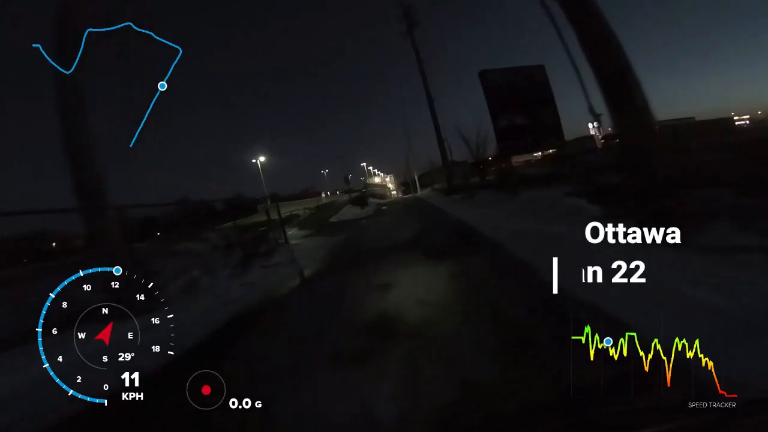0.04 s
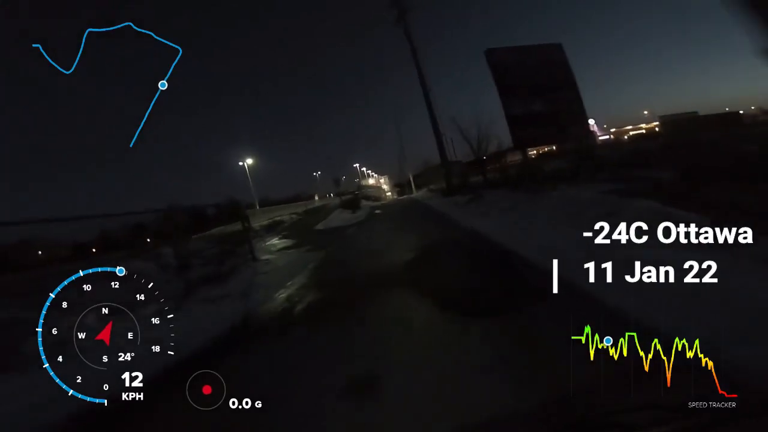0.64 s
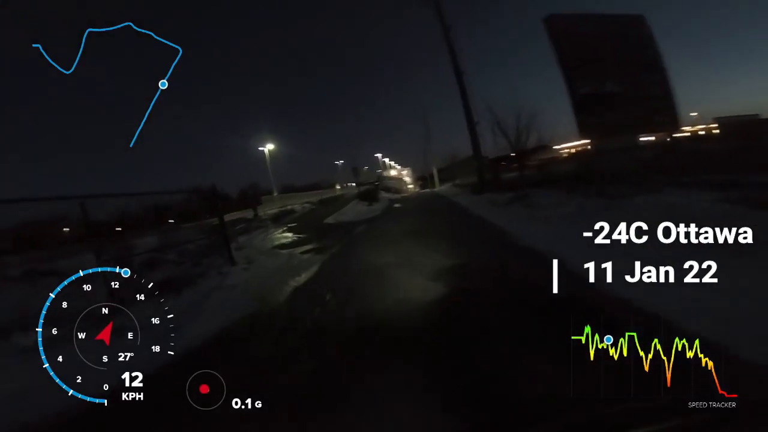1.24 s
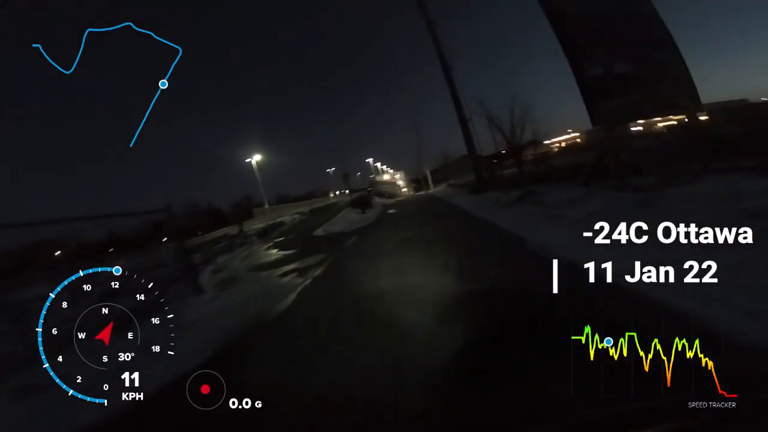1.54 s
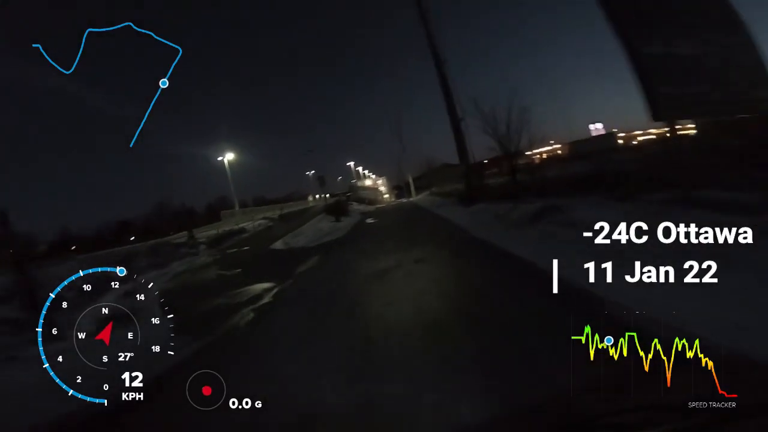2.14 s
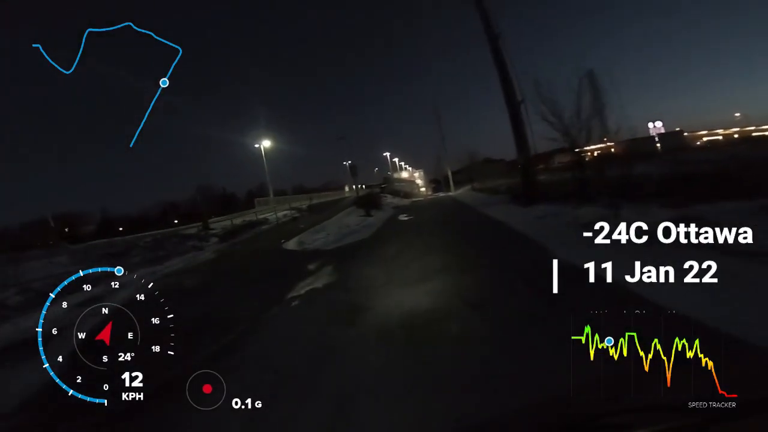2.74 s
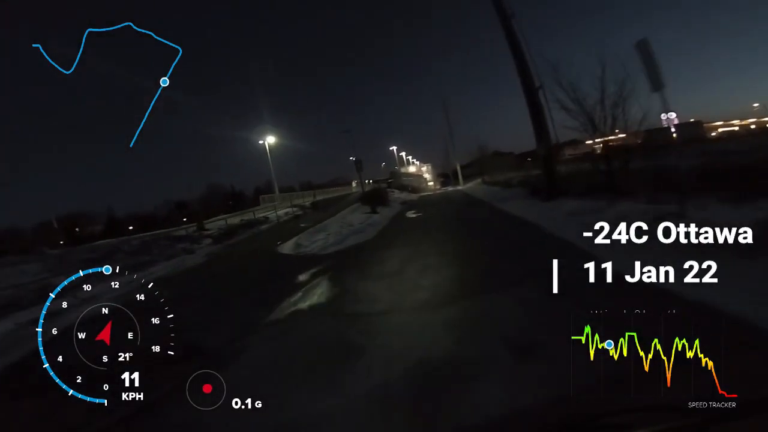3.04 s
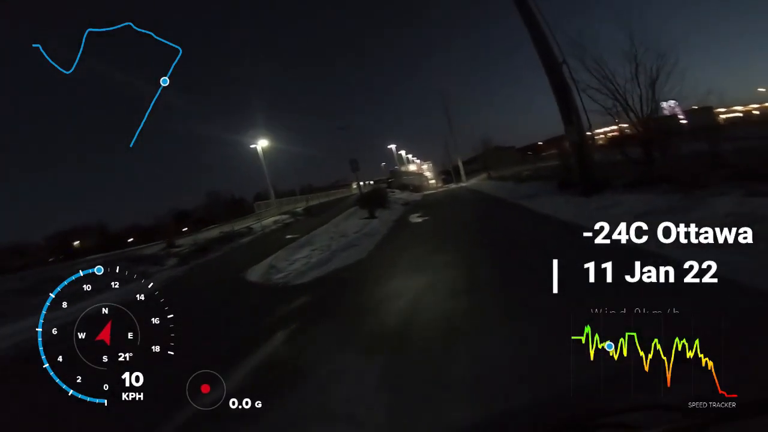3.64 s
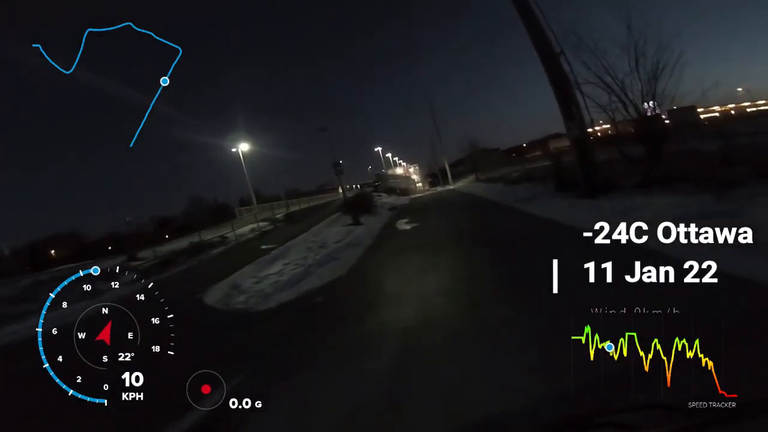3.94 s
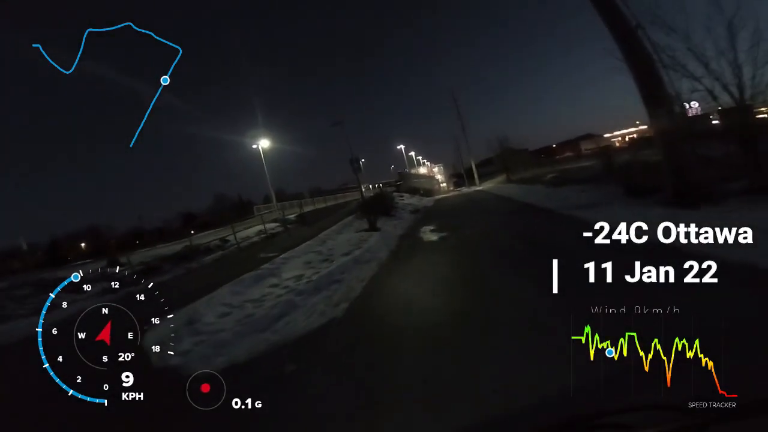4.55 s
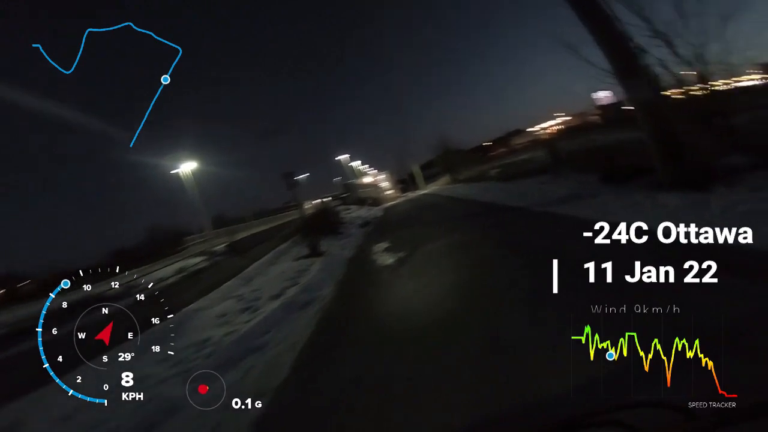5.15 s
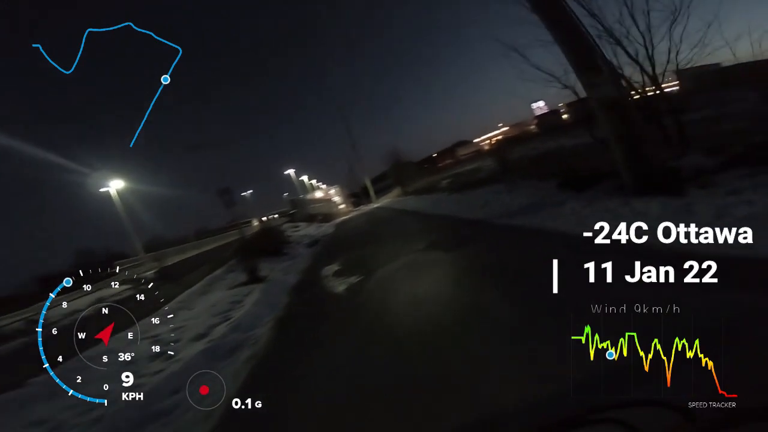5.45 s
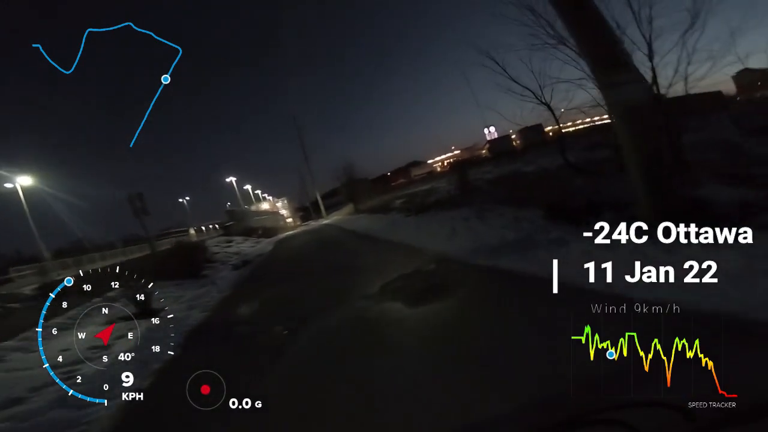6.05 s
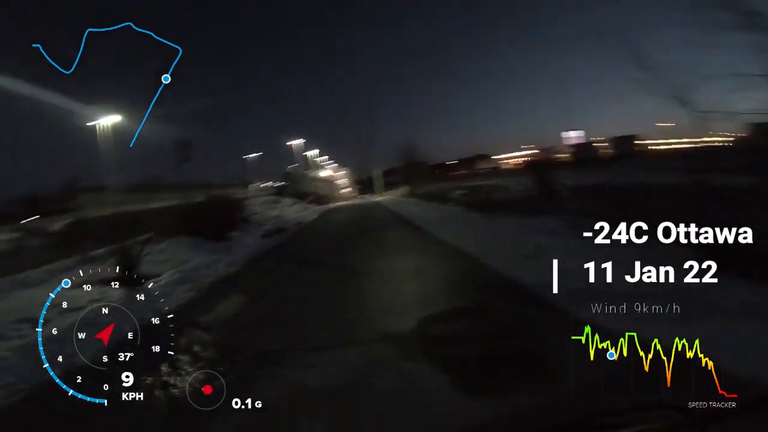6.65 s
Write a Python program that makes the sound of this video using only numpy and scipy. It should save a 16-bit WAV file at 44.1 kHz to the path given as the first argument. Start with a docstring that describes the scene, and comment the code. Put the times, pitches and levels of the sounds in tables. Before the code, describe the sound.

A bicycle rolls over a frozen path, heard from a microphone on the bike. A low, fluttering tyre hum, frame rumble and wind buffeting run throughout, above a faint crunch of frost. The chain rasps softly about three times a second with the pedalling and sometimes clacks. A rut thuds at 0.4 seconds and ice snaps at about 0.9. The hum swells unevenly between 1 and 3.4 seconds. At 2.3 seconds a sharp knock comes with a brief metallic clink, and smaller knocks and ticks follow around 3 and 4.2. From about 2.5 seconds the hum sinks in pitch as the bike slows. The heaviest low thump lands at 3.8 seconds, with the wind now slightly stronger. Softer bouncing jolts follow from 4.2 to 6.3, with chain clacks near 5.2 and 6. The bike is still rolling at almost 7 seconds.

```python
"""A low, fluttering hum and rumble: a bicycle rolls along a frozen path and slows down.
The tyre tread hums, bumps shake the frame and air buffets the microphone of a camera on the bike.
The chain rasps with each pedal stroke and sometimes clacks. Frost crunches finely under the tyres;
now and then a bit of ice snaps or a bump knocks the camera mount."""
import sys
import numpy as np
from scipy import signal
from scipy.fft import rfft, irfft, next_fast_len
from scipy.io import wavfile
from scipy.ndimage import uniform_filter1d, map_coordinates

SR = 44100
rng = np.random.default_rng(int(sys.argv[2]) if len(sys.argv) > 2 else 0)


def generate_wav(signal):
    """Clip the signal to [-1, 1] and save it as 16-bit WAV at the path in sys.argv[1]."""
    frames = np.transpose(np.atleast_2d(signal))
    scaled = np.clip(frames, -1, 1) * 32767
    pcm = np.round(scaled).astype(np.int16)
    wavfile.write(sys.argv[1], SR, pcm)


N = 299880

# what the frame lets through to the camera: (frequency [Hz], gain [dB])
FRAME_FILTER = [(150, -16.5), (400, 2.5), (960, 2.5), (1280, -18), (1700, -13.5), (3500, -43)]


def amp(db):
    """Turn decibels into a number to multiply by."""
    return 10 ** (np.asarray(db) / 20)


def unit(x):
    """Scale x to an average strength (rms) of 1."""
    return x / np.sqrt(np.mean(x ** 2) + 1e-20)


def curves(rows):
    """Join a table's points over time: one curve for each column after the first."""
    times, *columns = np.transpose(rows)
    return [np.interp(np.arange(N) / SR, times, column) for column in columns]


def wobble(rate):
    """A smooth curve through random points, rate of them a second."""
    points = rng.standard_normal(int(N * rate / SR) + 4)
    return unit(map_coordinates(points, [np.arange(N) * rate / SR]))


def filtered(x, response):
    """Multiply each frequency in x by response(hz)."""
    size = 2 * next_fast_len(N // 2 + SR // 4)
    return irfft(rfft(x, size) * response(np.fft.rfftfreq(size, 1 / SR)), size)[:N]


def coloured(x, points):
    """Give x the tone colour outlined by (frequency [Hz], gain [dB]) points."""
    def response(hz):
        point_hz, db = np.transpose(points)
        gain = amp(np.interp(np.log(hz + 1), np.log(point_hz), db))
        # fold the cepstrum so that the filter rings only after a hit, never before
        cepstrum = irfft(np.log(gain))
        half = len(cepstrum) // 2
        cepstrum[1:half] *= 2
        cepstrum[half + 1:] = 0
        return np.exp(rfft(cepstrum))
    return filtered(x, response)


def rung(x, modes):
    """Let x ring a body with (frequency [Hz], width [Hz], gain [dB]) resonances."""
    return filtered(x, lambda hz: sum(
        amp(db) * 1j * hz * width / (centre ** 2 - hz ** 2 + 1j * hz * width)
        for centre, width, db in modes))


def grains(rate, spread_db):
    """Tiny impacts of random size at random times, about rate a second."""
    size = amp(spread_db * np.clip(rng.standard_normal(N), -2, 2))
    happens = rng.random(N) < rate / SR
    return unit(happens * rng.choice([-1, 1], N) * size)


def strike(colour, db, t60):
    """A crack and a brief crumbling ring a body; db is the level of the loudest 2 ms."""
    t = np.arange(len(colour)) / SR
    # t60 is the time in seconds to fade by 60 dB
    crumble = rng.standard_normal(len(t)) * amp(-60 * t / t60) * (1 - np.exp(-t / 0.000065))
    crack = amp(15.5) * signal.unit_impulse(len(t), round(0.001003 * SR))  # 1 ms after first touch
    blow = signal.fftconvolve(crumble + crack, colour)[:len(t)]
    loudest = np.sqrt(uniform_filter1d(blow ** 2, SR // 500).max())
    return amp(db) * blow / loudest


def wind():
    """The head wind buffets the microphone, harder in the second half of the ride."""
    # strength of the gusts: (time [s], level [dB])
    gusts = [(0, -36), (1.0, -39), (3.2, -38.5), (3.7, -35), (4.3, -35), (4.6, -37), (5.3, -35.5),
             (6.8, -36.5)]
    # the wind's deep tone: (frequency [Hz], gain [dB])
    tone = [(10, -11), (25, -9), (45, -1), (65, -2), (110, -1.5), (200, -22), (400, -34), (1500, -79.5)]
    gust_db, = curves(gusts)
    return amp(gust_db + 1.5 * wobble(5)) * unit(coloured(rng.standard_normal(N), tone))


def rolling(speed, ground):
    """Grains of packed snow drum through the tyres into the mount, harder at speed."""
    # tone of the drumming: (frequency [Hz], gain [dB])
    tone = [(120, -23.5), (260, -3), (330, 3.5), (420, 5.5), (600, 4.5), (800, 2.5), (950, -5),
            (1100, -5.5), (1200, -14), (1420, -25), (1650, -8.5), (1850, -20.5), (2500, -35), (4000, -55.5)]
    drumming = unit(coloured(grains(rate=2500, spread_db=4.0), tone))
    return amp(-50.5 + 1.2 * ground + 1.76 * wobble(30)) * speed ** 0.52 * drumming


def crunch(speed, ground, push):
    """Frost crumbles in small clumps under the tread; coarse ice crackles and fine crystals glint."""
    # frost under the tyres: (time [s], level [dB], coarse grit compared with fine [dB])
    frost = [(0, -68.5, -5), (0.5, -66, -2.5), (0.8, -69.5, -6), (1.1, -65, -5), (1.3, -72, -8),
             (1.65, -65.3, -2.5), (1.85, -68.5, -4.5), (2.25, -69.5, -3), (2.38, -66, 2.5),
             (2.66, -66, 2.5), (2.76, -68.5, -0.5), (2.95, -66.5, 2), (3.1, -69, -2.5), (3.6, -69.5, -2),
             (3.9, -67.5, -3), (4.7, -68, -1), (5.7, -67, -5.5), (6.4, -65.5, -2), (6.8, -68.5, -3)]
    # tones of hissing frost, crackling ice and glinting crystals: (frequency [Hz], gain [dB])
    hiss_tone = [(900, -17), (2000, -17.5), (2600, -20), (3500, -17.5), (3900, -13.5), (4300, -3),
                 (4900, 1.5), (5150, 0), (5550, 0.5), (6200, -8.5), (7000, -19.5), (8200, -23),
                 (10500, -41.5), (16000, -59)]
    crackle_tone = [(300, -9), (1000, -1.5), (1700, 5.5), (2200, 0), (2800, -3), (3400, -2.5), (4300, 0.5),
                    (5900, -12), (6800, -29.5), (15000, -40.5)]
    glint_tone = [(3000, -20), (6800, -0.5), (8100, 8), (9000, 2), (10000, -7), (11500, -25.5), (12500, -8),
                  (14000, -18), (16000, -24.5)]
    level_db, grit_db = curves(frost)
    crust_db = 1.15 * wobble(30)  # the crust is uneven
    bite_db = 0.14 * push / push.max()  # pedalling drives the rear tyre into the frost
    level_db = level_db + crust_db + bite_db + 0.2 * ground
    fine = unit(rng.standard_normal(N) * amp(1.7 * wobble(170)))
    breaks = grains(rate=90 * speed, spread_db=2.5) ** 2
    crumble_s = 0.0012  # how long one clump takes to break
    crumbling = signal.lfilter([1], [1, -np.exp(-1 / (crumble_s * SR))], breaks)
    coarse = amp(grit_db) * unit(np.sqrt(np.abs(crumbling)) * rng.standard_normal(N))
    hiss = unit(coloured((fine + coarse) / np.hypot(1, amp(grit_db)), hiss_tone))
    ice = grains(rate=1200, spread_db=6.0) * amp(5.7 * np.tanh(wobble(70)))
    crackles = unit(coloured(ice, crackle_tone))
    crystals = grains(rate=1800, spread_db=3.5) * amp(2 * wobble(25))
    glints = unit(coloured(crystals, glint_tone))
    return amp(level_db + 3.5) * (hiss + amp(-11.0) * crackles + amp(-16.0) * glints)


def hits():
    """Snow pops, ice splits and snaps, crystals ping; bumps tick the camera shell and knock its mount."""
    # the tone of each thing struck: (frequency [Hz], gain [dB])
    ice_tone = [(400, -4), (900, -1.5), (1700, 2), (2400, -7.5), (2900, -4), (3600, -3), (4300, 8),
                (5000, 2.5), (5600, -0.5), (6400, -11), (7200, -25), (15000, -41.5)]  # a plate of ice splitting
    snow_tone = [(300, -10.5), (1000, 2), (1700, 8.5), (2300, 0), (2900, -6), (3500, -18), (5000, -24.5),
                 (15000, -45)]  # packed snow giving way
    shell_tone = [(1500, -30.5), (3000, -19), (3600, -10.5), (4300, 2.5), (4900, 7), (5550, 2.5),
                  (6200, -4), (7100, -21.5), (8100, -24), (10500, -45.5), (15000, -49.5)]
    crystal_tone = [(3000, -21), (6800, -1.5), (8100, 10.5), (9800, -2.5), (11200, -17.5), (12400, -15.5),
                    (16000, -26)]
    grit_tone = [(900, -18), (1700, -5), (2300, -1), (3200, -2.5), (4400, 3), (5600, 1), (7200, -16),
                 (15000, -40)]  # a grain of ice
    splinter_tone = [(7000, -20.5), (11000, -8), (12400, 1), (16000, -6.5)]  # an ice splinter flung at the camera
    # how the camera mount rings: (frequency [Hz], width [Hz], gain [dB])
    mount_modes = [(420, 390, -14.5), (530, 13, -5.5), (630, 48, 0.5), (830, 79, -3.5), (1590, 330, -7.5)]
    # lumps in the path: (time [s], snow pop [dB], shell tick [dB], mount knock [dB], crystal ping [dB])
    bumps = [(0.428, -62, -59, -37.5, -81), (0.63, -62, -51.5, -46, -72), (0.839, -66, -51, -50, -80),
             (0.85, -57, -49, -46, -72.5), (2.032, -54.5, -57, -41.5, -66),
             (2.3209, -52, -42.5, -26.5, -62), (2.5147, -66, -50, -44, -77), (2.8555, -50.5, -63, -43, -80),
             (2.9705, -71, -50.5, -58, -78), (2.985, -54.5, -49.5, -31.5, -77),
             (3.2266, -71, -54, -54, -74), (3.332, -58.5, -55, -40.5, -82), (3.4375, -62, -46, -53, -59),
             (3.511, -61.5, -53, -45, -79), (3.9118, -62, -51, -38.5, -80), (4.0023, -68, -54, -55, -69),
             (4.087, -56.5, -59, -56, -72), (4.188, -58, -48.5, -35, -59), (5.022, -61, -66, -39, -80),
             (5.087, -56, -50, -37.5, -75), (5.123, -70, -70, -39, -82), (5.617, -58, -61.5, -41, -75.5),
             (6.494, -67, -67, -42.5, -63), (6.680, -75, -82, -40.5, -79)]
    # single crystals, ice grains and splinters: (time [s], level [dB])
    pings = [(.5102, -65), (1.014, -64.5), (1.868, -66.5), (2.895, -63.5), (3.218, -66), (6.229, -62),
             (6.455, -67)]
    snaps = [(.0732, -60), (.1186, -56), (0.1765, -55), (0.4355, -54), (.5387, -58), (2.7684, -60),
             (3.892, -57), (4.7678, -59), (4.9144, -57), (4.965, -56), (5.3056, -55.5), (6.0155, -55),
             (6.065, -57), (6.1549, -57), (6.231, -57), (6.2532, -55), (6.3278, -58)]
    splinters = [(2.032, -69), (2.321, -70.5), (4.188, -62), (5.63, -72.5)]
    # how each thing answers one sharp click
    click = signal.unit_impulse(N)
    tones = (ice_tone, snow_tone, shell_tone, crystal_tone, grit_tone, splinter_tone)
    ice, snow, shell, crystal, grit, splinter = [coloured(click, tone)[:SR // 12] for tone in tones]
    mount = coloured(rung(click, mount_modes), FRAME_FILTER)[:SR // 12]
    blows = [(s, strike(snow, pop_db, t60=0.034) + strike(shell, tick_db, t60=0.027)
              + strike(mount, knock_db, t60=0.0061) + strike(crystal, ping_db, t60=0.022))
             for s, pop_db, tick_db, knock_db, ping_db in bumps]
    blows += [(0.8523, strike(ice, db=-35, t60=0.026))]
    blows += [(s, strike(crystal, db, t60=0.011)) for s, db in pings]
    blows += [(s, strike(grit, db, t60=0.012)) for s, db in snaps]
    blows += [(s, strike(splinter, db, t60=0.012)) for s, db in splinters]
    out = np.zeros(N + SR)
    for s, blow in blows:
        out[round(s * SR):][:len(blow)] += blow
    return out[:N]


def rattle():
    """The hardest knock shakes a loose metal part, which rings briefly."""
    # the metal's notes: (frequency [Hz], gain [dB], time to fade by 60 dB [s])
    notes = [(2680, -27, 0.027), (4610, -8.5, 0.029), (4870, 0.5, 0.019)]
    start_s, rise_s = 2.3185, 0.0019
    t = np.maximum(np.arange(N) / SR - start_s, 0)
    ring = sum(amp(db - 60 * t / t60) * np.sin(2 * np.pi * hz * t) for hz, db, t60 in notes)
    return amp(-25) * (1 - np.exp(-(t / rise_s) ** 2)) * ring


def pedalling():
    """The push on the pedals as a gain: each foot comes on quickly, holds and lets go."""
    # pedal strokes, one leg after the other: (middle [s], length [s], level [dB])
    strokes = [(0.483, 0.17, -48), (0.782, 0.18, -48), (1.083, 0.18, -47), (1.421, 0.22, -62),
               (1.684, 0.14, -45.5), (1.994, 0.21, -48), (2.315, 0.23, -46.5), (2.583, 0.2, -47.5),
               (2.952, 0.25, -46.5), (3.26, 0.26, -52), (3.648, 0.19, -44.5), (3.957, 0.25, -49.5),
               (4.382, 0.26, -44), (4.706, 0.21, -47), (5.217, 0.26, -46.5), (5.587, 0.2, -44.5),
               (6.065, 0.31, -44.5), (6.446, 0.24, -47)]
    squareness = 3.5  # 2 gives a bell shape; more gives a flatter top
    t = np.arange(N) / SR
    return sum(amp(db) * np.exp(-np.abs(2 * (t - s) / length) ** squareness)
               for s, length, db in strokes)


def chain_rasp(speed, push):
    """Chain links drop onto the cog one by one and scrape a little, louder as each foot pushes."""
    # how the front and rear cogs ring: (frequency [Hz], width [Hz], gain [dB])
    cog_modes = [(436, 15, -20), (510, 58, -21), (660, 100, -5.5), (828, 37, 4), (894, 32, 5.5),
                 (1060, 110, -19), (1620, 130, -27)]
    links_per_s, scatter_s, spread_db = 63.84, 0.0016, 2.6  # pace at average speed; uneven time and size
    links_passed = np.cumsum(links_per_s * speed) / SR
    landings = np.flatnonzero(np.diff(np.floor(links_passed)))
    late, size = np.clip(rng.standard_normal((len(landings), 2)), -1.5, 1.5).T
    landings = np.clip(landings + np.round(late * scatter_s * SR).astype(int), 0, N - 1)
    taps = unit(np.bincount(landings, amp(spread_db * size), N))
    scraping = amp(-5.5) * rng.standard_normal(N)
    rasp = unit(coloured(rung(taps + scraping, cog_modes), FRAME_FILTER))
    slack = amp(-62)  # the chain still whispers between pushes
    return amp(-3.5) * (push + slack) * rasp


def chain_clacks():
    """A link that lands hard makes the front cog ring, swelling and dying within a few cycles."""
    # links that clack under load: (time [s], level [dB])
    clacks = [(.479, -43), (.709, -39), (.801, -38), (2.323, -33), (2.623, -40), (2.955, -41), (3.591, -39),
              (3.645, -39), (3.694, -35.5), (5.046, -43), (5.186, -36), (5.208, -33.5), (5.961, -40),
              (6.045, -40), (6.070, -35.5)]
    ring_hz, pitch_spread, rise_s = 880, 0.04, 0.0048
    t = np.arange(SR // 20) / SR
    swell = (t / rise_s * np.exp(1 - t / rise_s)) ** 2
    out = np.zeros(N + SR)
    for (s, db), detune in zip(clacks, rng.standard_normal(len(clacks))):
        hz = ring_hz * (1 + pitch_spread * detune)
        out[round(s * SR):][:len(t)] += amp(db) * swell * np.sin(2 * np.pi * hz * t)
    return out[:N]


def frame_rumble():
    """The uneven path shakes the frame; a rut makes it bounce and settle."""
    # the frame's low tone: (frequency [Hz], gain [dB])
    tone = [(45, -44.5), (70, -8), (92, -1.5), (115, -3.5), (135, -11.5), (152, -13), (185, -28.5),
            (225, -28), (270, -41.5), (600, -86)]
    # jolts from ruts: (time [s], level [dB], bounce [Hz], time to fade by 60 dB [s])
    jolts = [(0.39, -14, 102.6, 0.13), (0.811, -22.5, 44.4, 0.34), (3.81, -9, 88, 0.067),
             (4.186, -20.5, 92.6, 0.79), (4.599, -32, 146.6, 0.85), (4.84, -24.5, 96.9, 0.8),
             (5.185, -22.5, 87.2, 0.39), (5.579, -24, 101.5, 0.6), (6.25, -31, 97, 0.94)]
    out = amp(-33 + 1.6 * wobble(7)) * unit(coloured(rng.standard_normal(N), tone))
    for s, db, bounce_hz, t60 in jolts:
        t = np.maximum(np.arange(N) / SR - s, 0)
        envelope = amp(db - 60 * t / t60) * (1 - np.exp(-t / 0.004))
        out -= envelope * np.sin(2 * np.pi * bounce_hz * t)
    return out


def tyre_hum(pitch_hz):
    """Tread blocks meet the ground at a rate set by the speed; uneven ice makes the hum flutter."""
    # the hum, louder where the ground is hard: (time [s], level [dB])
    loudness = [(0, -37.5), (0.45, -29.5), (0.6, -38.5), (0.8, -30.5), (1.07, -25), (1.33, -39),
                (1.42, -30), (1.55, -30), (1.72, -24), (1.93, -26.5), (2.01, -36), (2.1, -24.5),
                (2.33, -35.5), (2.48, -33.5), (2.57, -21.5), (2.72, -31), (2.85, -25), (3.1, -27),
                (3.22, -32), (3.36, -27), (3.55, -36), (3.95, -31), (4.12, -39.5), (4.65, -35), (5.0, -32),
                (5.3, -28.5), (5.85, -30.5), (6.15, -34), (6.42, -45), (6.52, -32), (6.8, -25.5)]
    level_db, = curves(loudness)
    wavering_hz = pitch_hz * (1 + 0.016 * wobble(14))
    phase = 2 * np.pi * np.cumsum(wavering_hz) / SR
    flutter = 1 + 0.48 * np.tanh(wobble(18))
    hum = np.sin(phase) + amp(-31.5) * np.sin(2 * phase)
    return amp(level_db - 1.0) * unit(flutter * hum)


def scene():
    """The whole ride at one microphone; the speed paces the tread, chain links and frost clumps."""
    # road speed, heard as the pitch of the tread: (time [s], pitch [Hz])
    tread_pitch = [(0, 98.04), (0.5, 99), (1.1, 100.1), (2.3, 98.95), (2.8, 90.92), (3.4, 85), (4.1, 82.98),
                   (4.5, 72.54), (5.0, 70.49), (5.5, 71.05), (6.0, 68.43), (6.8, 73.06)]
    pitch_hz, = curves(tread_pitch)
    speed = pitch_hz / np.mean(pitch_hz)  # 1 is the average speed
    ground = wobble(11)  # makes rolling and crunch swell together
    push = pedalling()
    bicycle = tyre_hum(pitch_hz) + frame_rumble() + chain_rasp(speed, push) + chain_clacks()
    path = rolling(speed, ground) + crunch(speed, ground, push) + hits()
    return (bicycle + path + rattle() + wind())[None]


def record(dry):
    """The camera cuts off the very highest treble."""
    top_hz = 15750
    return np.array([filtered(channel, lambda hz: hz < top_hz) for channel in dry])


dry = scene()
out = record(dry)
generate_wav(out)
```